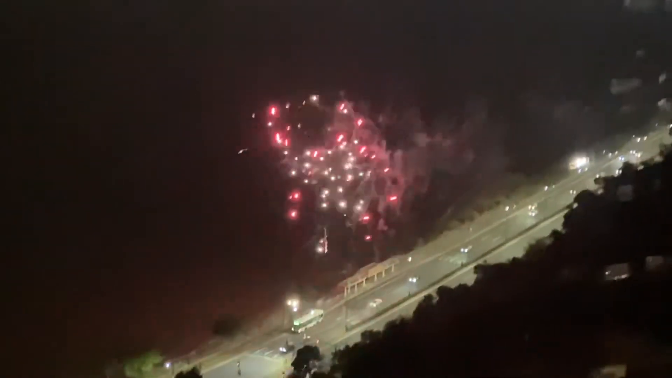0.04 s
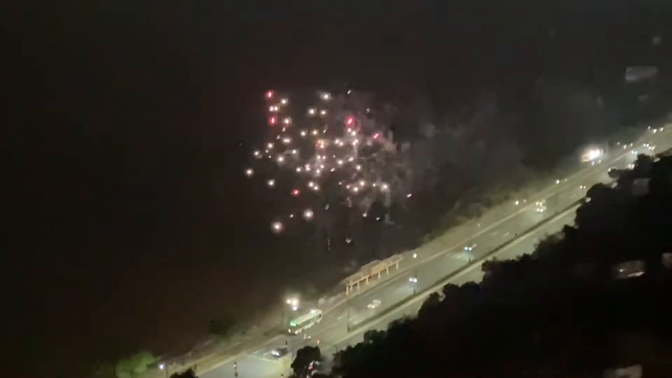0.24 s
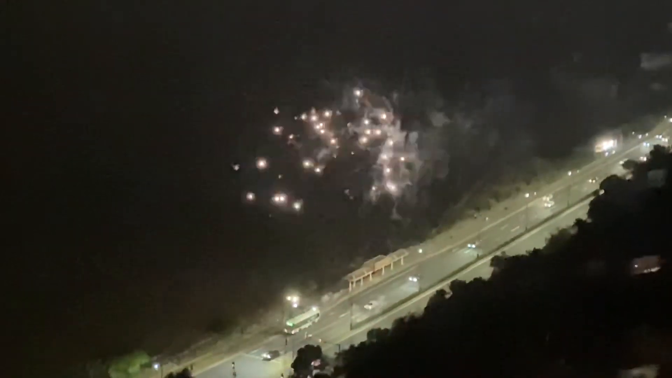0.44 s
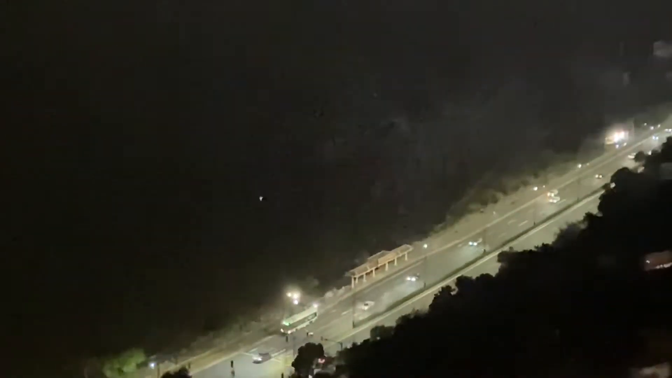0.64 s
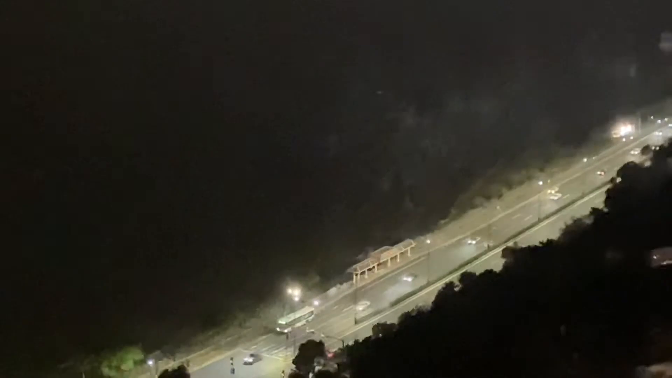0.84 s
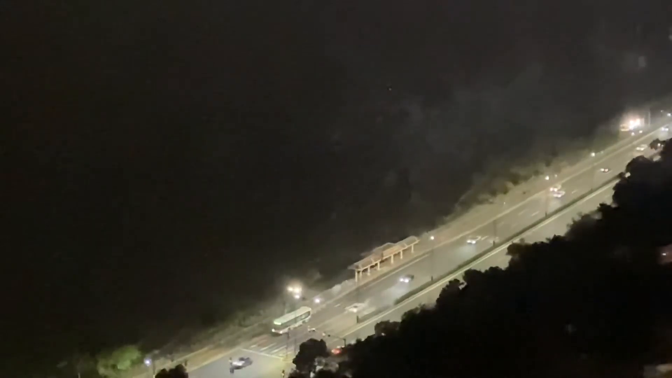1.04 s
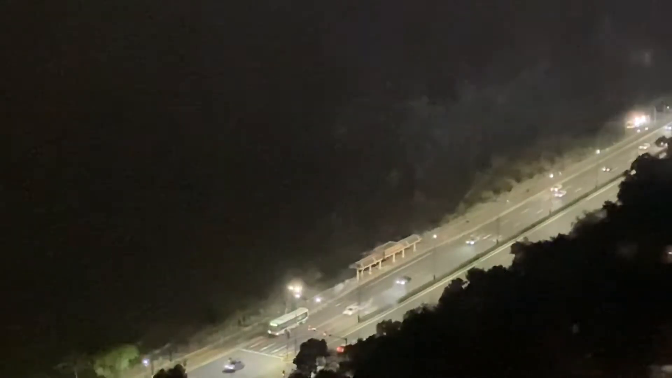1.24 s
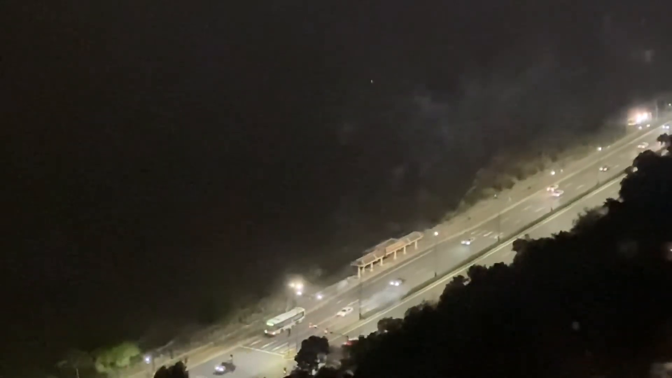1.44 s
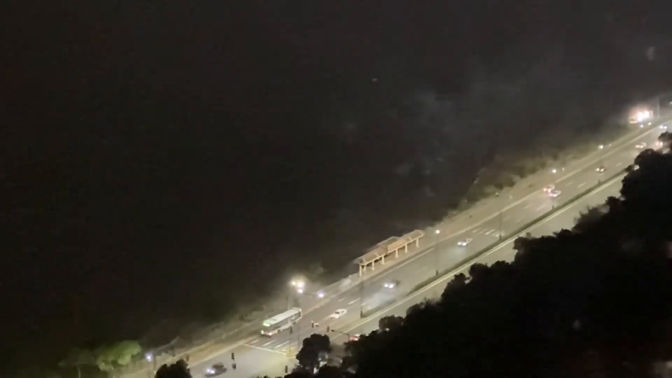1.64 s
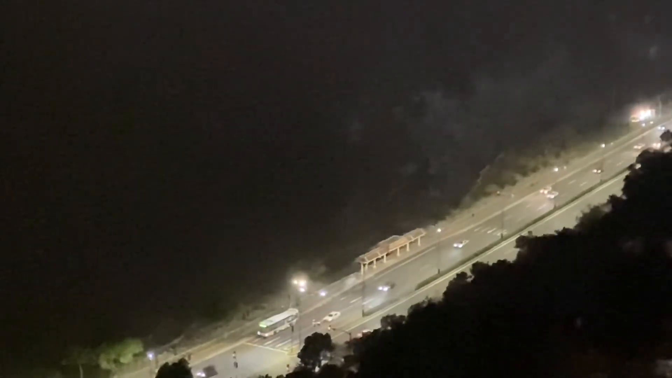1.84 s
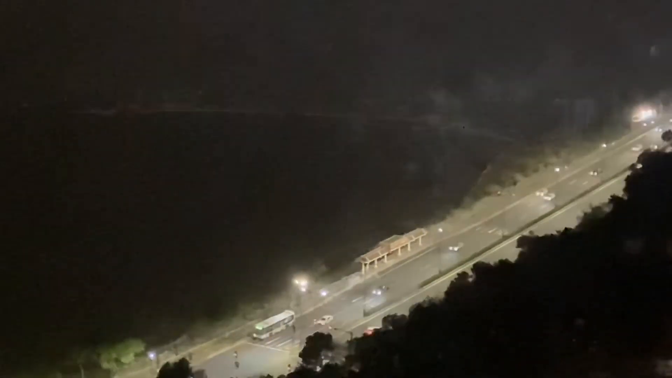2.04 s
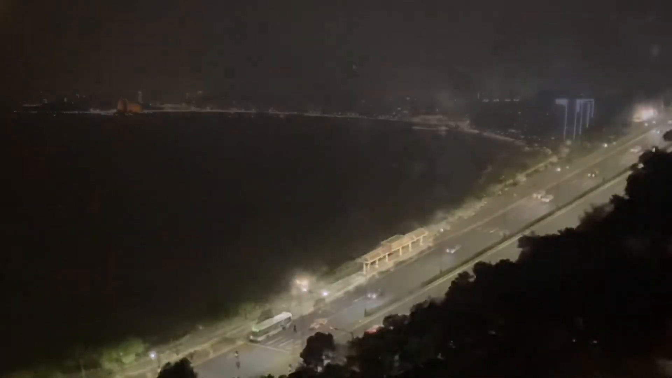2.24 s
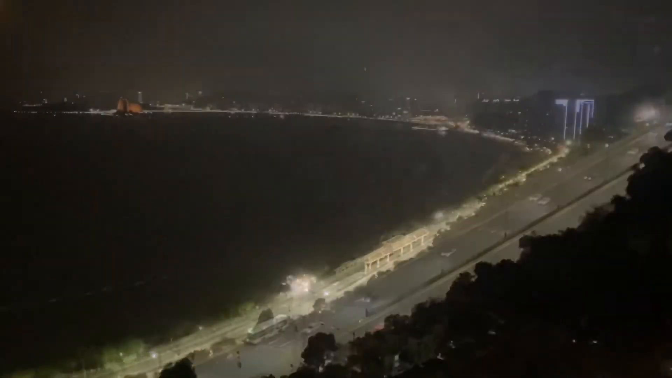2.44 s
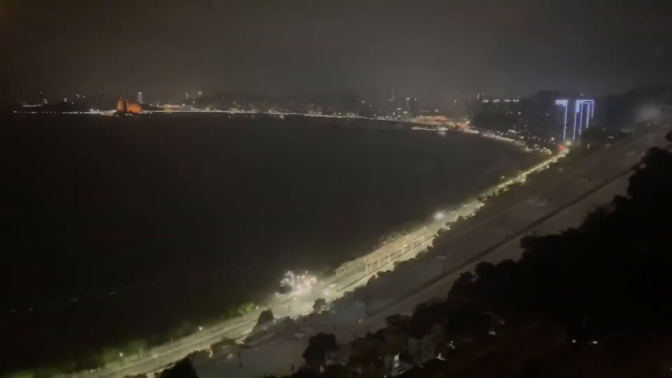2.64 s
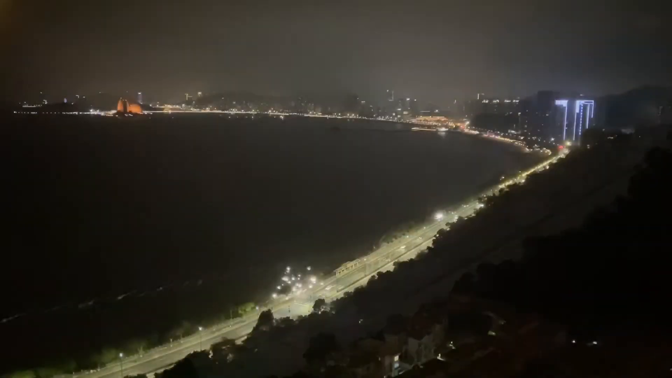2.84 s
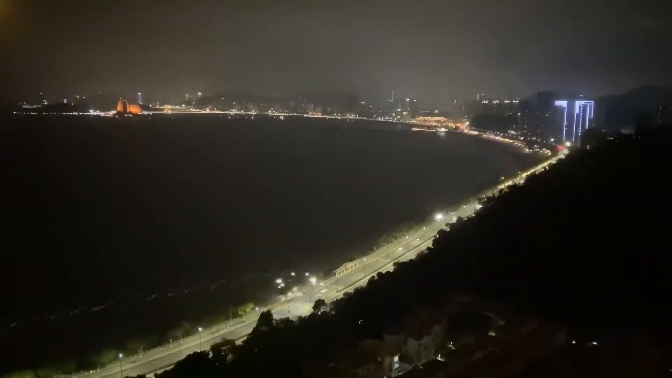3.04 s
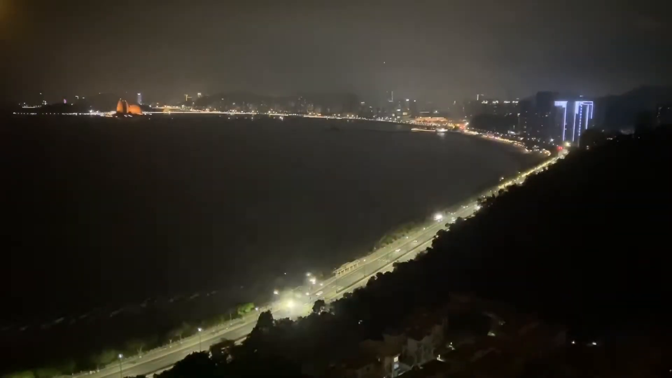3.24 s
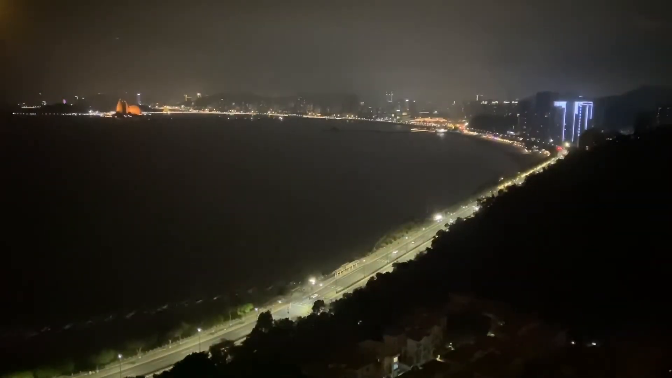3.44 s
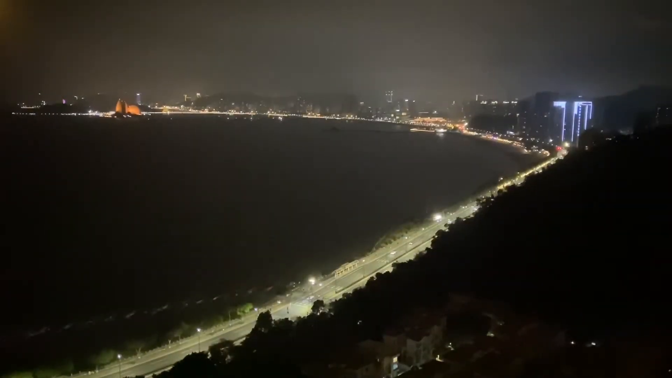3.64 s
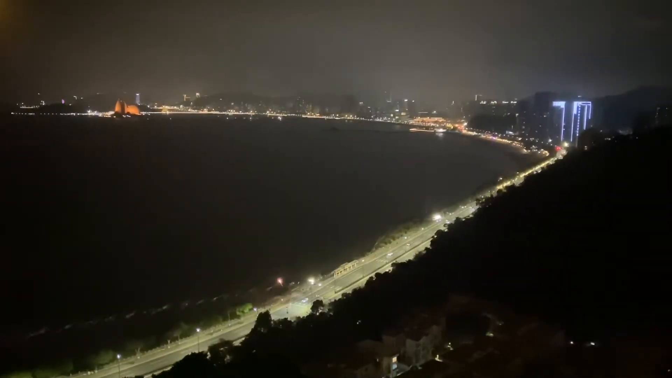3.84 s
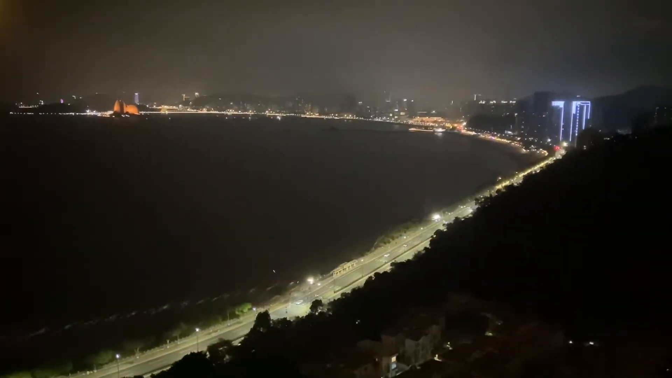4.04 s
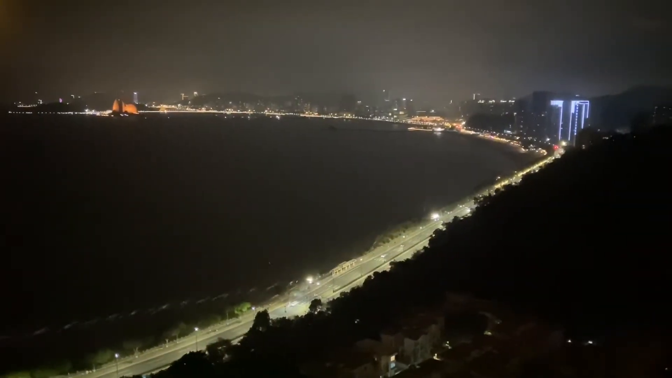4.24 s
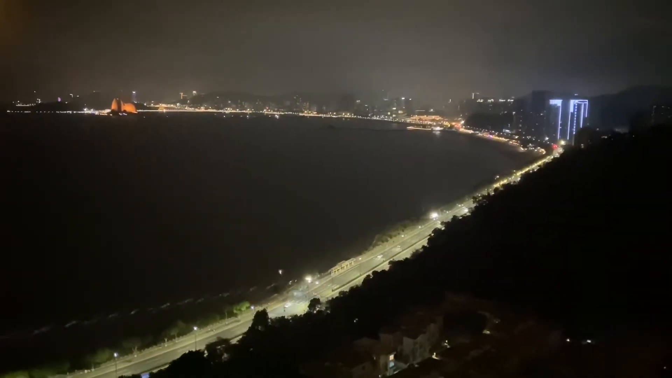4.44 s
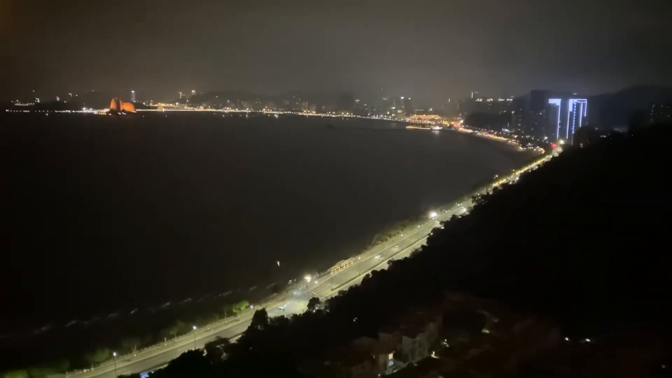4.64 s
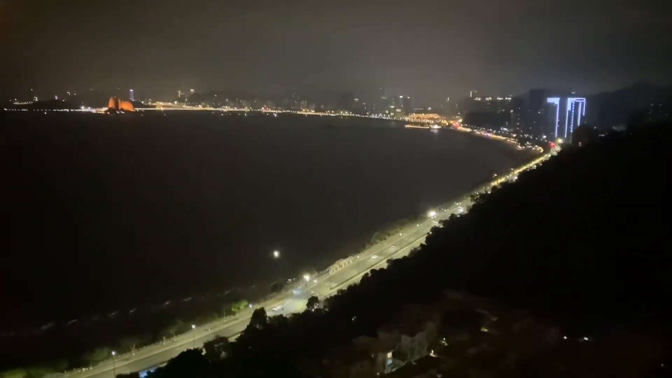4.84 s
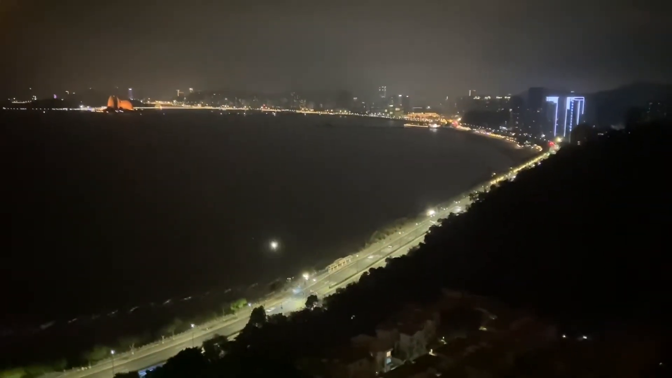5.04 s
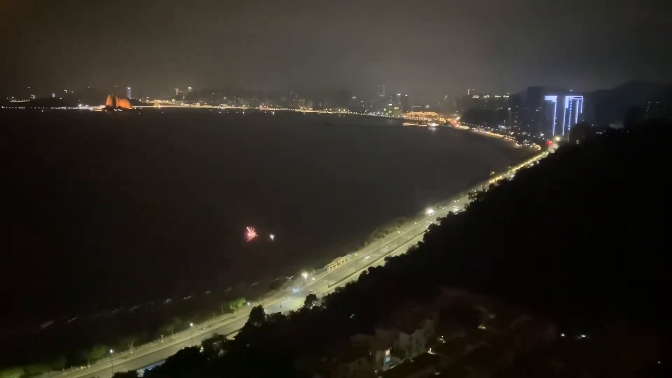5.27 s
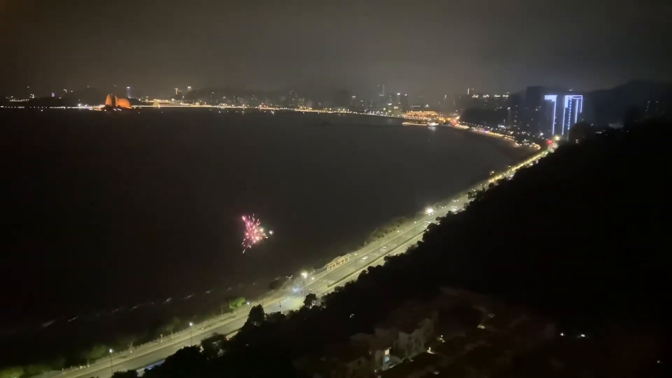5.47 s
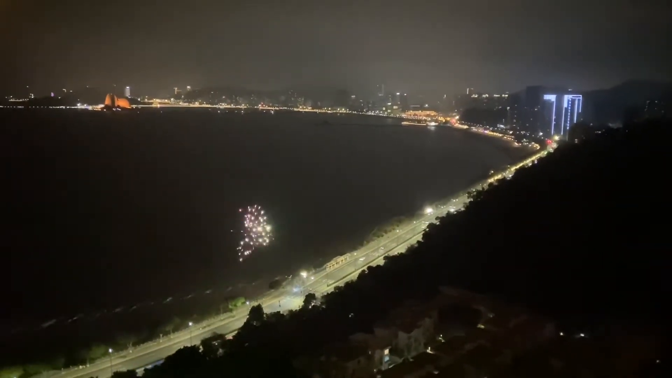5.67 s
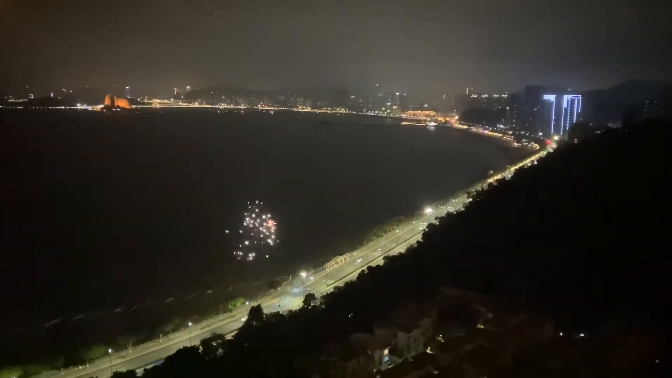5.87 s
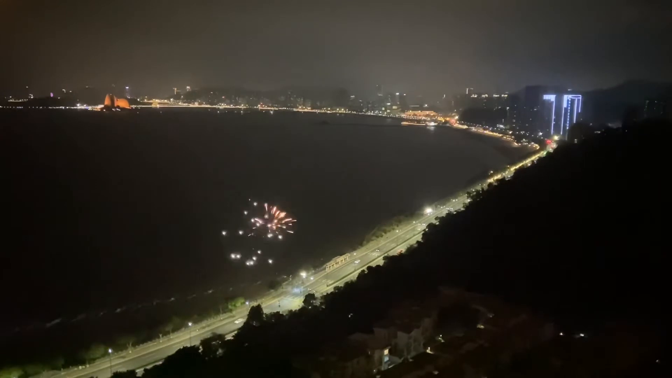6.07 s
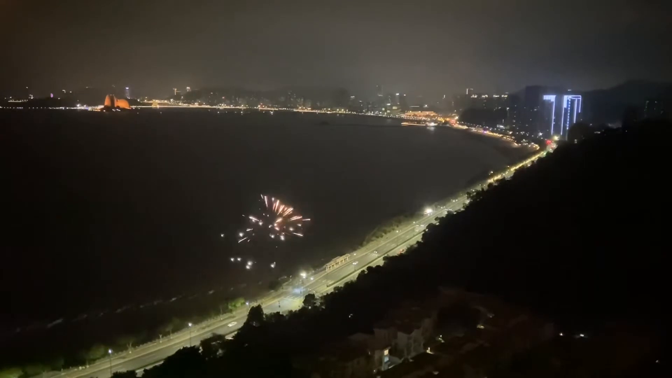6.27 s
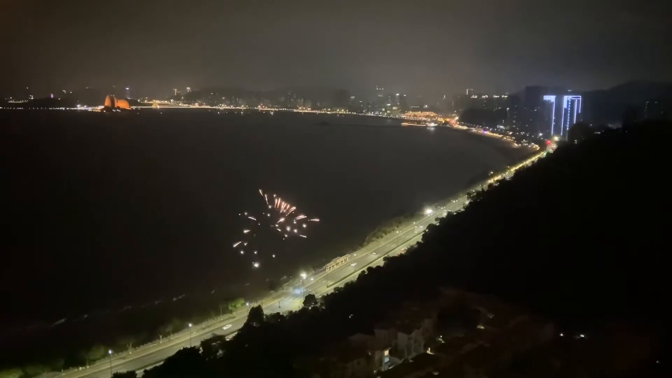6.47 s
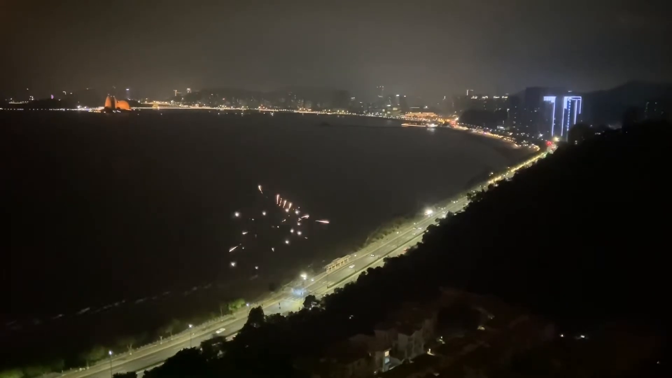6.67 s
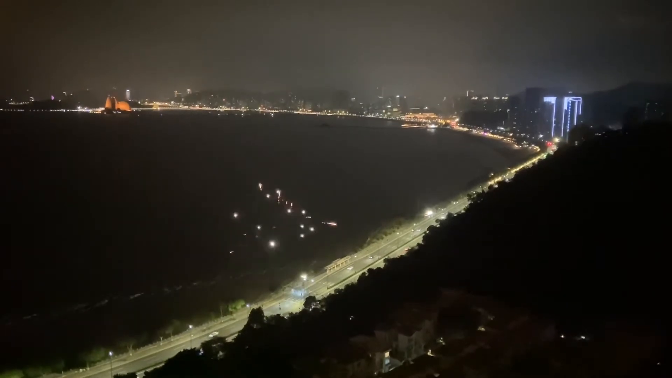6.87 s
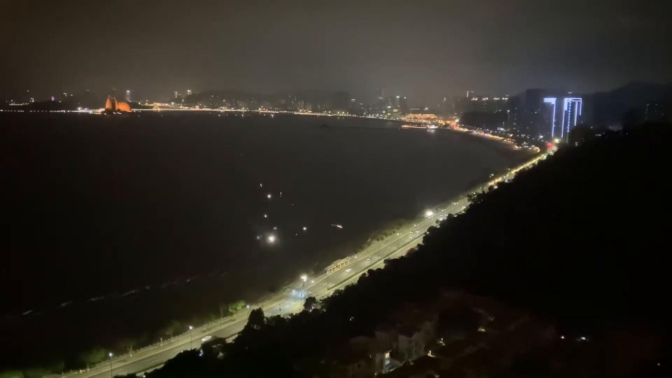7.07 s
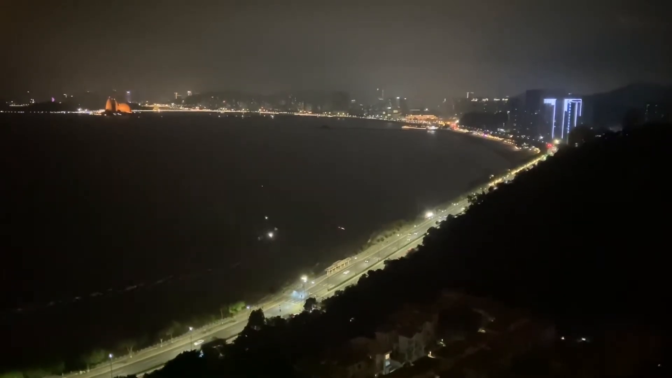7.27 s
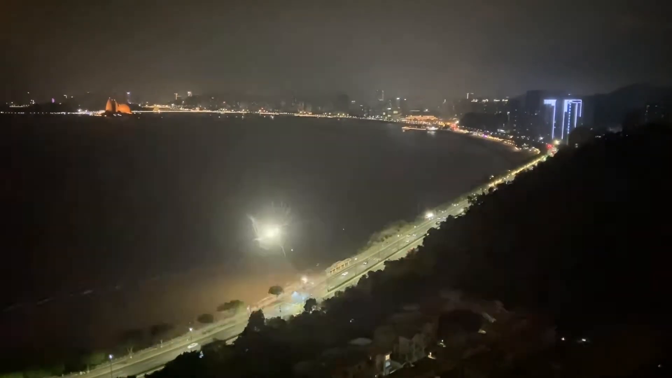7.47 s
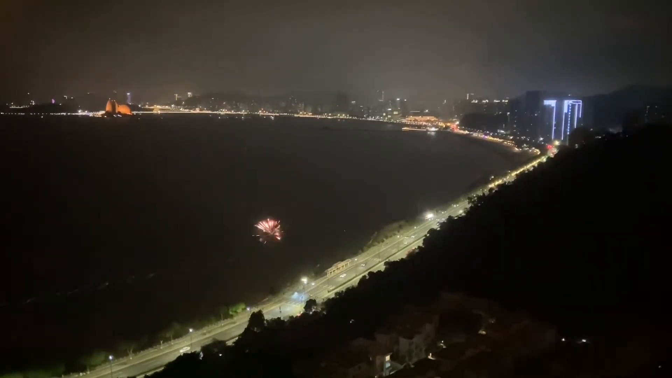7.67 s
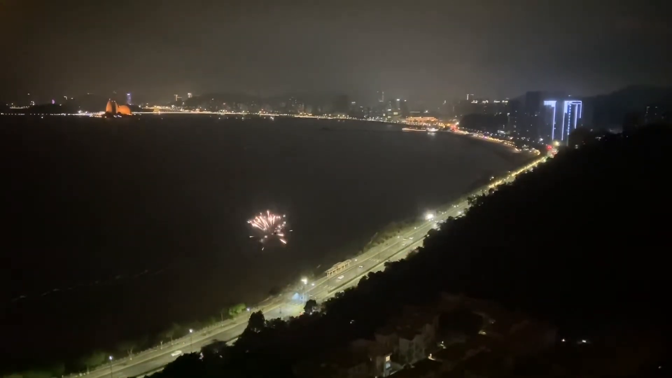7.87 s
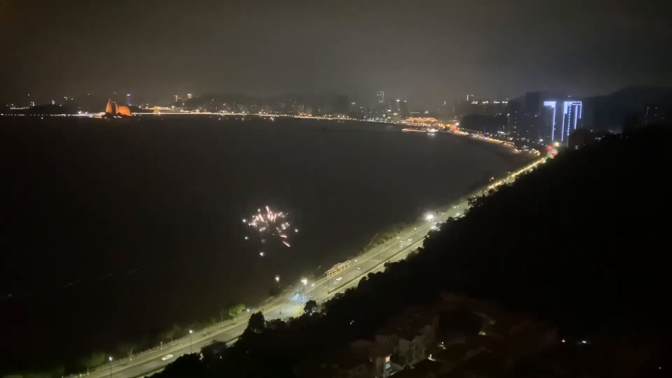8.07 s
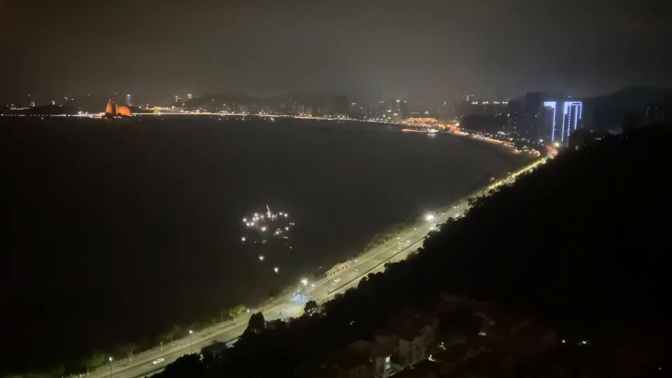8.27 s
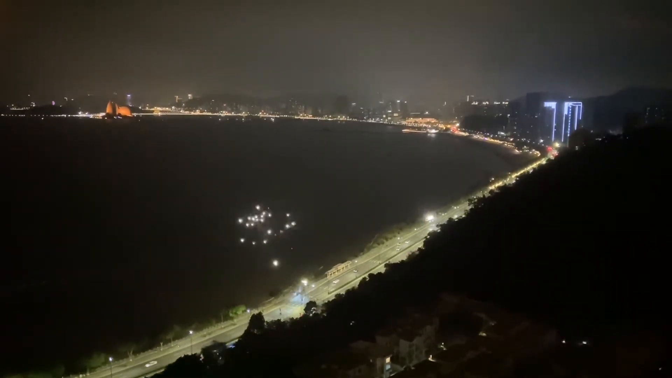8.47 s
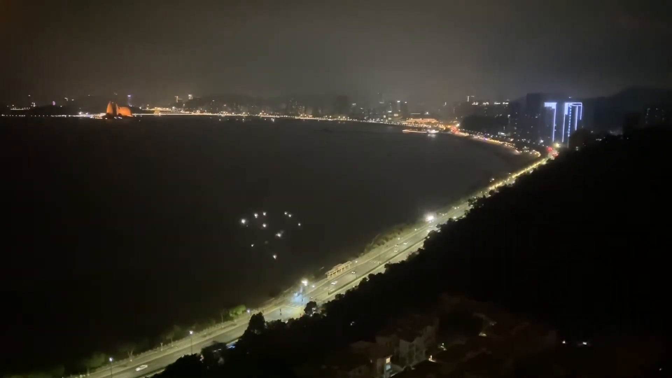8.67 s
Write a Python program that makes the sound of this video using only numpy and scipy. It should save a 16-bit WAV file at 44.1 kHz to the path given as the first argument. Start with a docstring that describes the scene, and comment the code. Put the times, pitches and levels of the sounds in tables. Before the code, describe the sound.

Night fireworks over a bay, heard on a phone from a high balcony. A fading roll and faint hum, then three rapid hard bangs and a dense crackle of burning stars. The sound opens wider; one weaker and one strong bang echo. Wind thumps the microphone around two distant pops, then two loud bangs, brief wind again and a last bang.

```python
"""Fireworks over a bay at night, heard by a phone on a high balcony.
City hum and the roll of an earlier shell come first; then three bangs and a crackle of stars, in a narrow beam.
The camera zooms out and the beam opens wide. Two more bangs, wind buffets with two far pops, then three bangs
and wind again. Bangs are shaped pulses that bounce off water, ring the balcony, slap back from walls and roll
away as decaying scatter; hum and crackle are filtered noise, buffets are thumps with noise."""
import sys
import numpy as np
from scipy import signal
from scipy.fft import rfft, irfft, next_fast_len
from scipy.io import wavfile
from scipy.ndimage import uniform_filter1d

SR = 44100
rng = np.random.default_rng(int(sys.argv[2]) if len(sys.argv) > 2 else 0)


def master(y):
    """Save y as 16-bit WAV."""
    cut = np.clip(np.atleast_2d(y).T, -1, 1)
    pcm = np.round(cut * 32767)  # scale
    wavfile.write(sys.argv[1], SR, pcm.astype(np.int16))


N = 384111

# All levels are relative gains.
# Echo fields of the roll: first_s, swell_s, t60_s, bass_db, treble_db
ECHO_FIELDS = [(.002, 0.0032, 0.26, -6.5, 4), (.03, 0.032, 0.96, -12, -5), (0.2, 0.091, 3.3, -18, -8),
               (.6, 0.33, 2.9, -22, -35.5)]
# Shell gone off before the start: level_db, tilt_db_per_octave, slap_db
EARLIER_SHELL = (-11, 1.4, -16)
# Blast spectrum: freq_hz, level_db
BLAST_SPECTRUM = [(20, -23.5), (45, -18.5), (100, -1.5), (150, -0.5), (210, -1), (320, 0.5), (430, 1.5),
                  (600, -9), (1100, -14), (1600, -24.5), (2200, -29.5), (3300, -39.5), (5000, -54.5),
                  (8000, -64), (9200, -75), (11000, -72), (13000, -80.5), (15500, -82.5)]
# Air modes of the balcony recess: freq_hz, t60_s, narrow_beam_db, wide_beam_db
BALCONY_MODES = [(103.1, 0.41, 19, 10.5), (143.3, 0.086, 12.5, 5.5), (213, 0.15, 15.5, 7.5),
                 (298.8, 0.15, 11.5, 3), (405.4, 0.2, 1.5, -0.5), (711, 0.057, -14, 0),
                 (880, 0.024, 0.5, -9), (1098.4, 0.15, 2.5, 5.5), (1308, 0.12, -8.5, 2.5),
                 (2126, 0.092, 12, -6.5), (3040, 0.36, -3.5, 5), (3260, 0.14, 14, 0)]
# Far walls: delay_s, narrow_beam_db, wide_beam_db, tilt_db_per_octave, bass_db, glint_db,
# rise_ms, smear_ms, flat_face_db
FAR_WALLS = [(.222, -31, -14.5, 5, -13.5, 6.5, 4.8, 54, -14),
             (0.257, -24.5, -13.5, 7, 3.5, -2.5, 2.3, 9.8, -13), (0.282, -17, -12, 5.5, -11, 2, 4, 14, -4),
             (.332, -3, -1.05, 4.5, -11.5, -1.5, 3.7, 16.5, -10.5)]
# Bright ring carried by slaps: freq_hz, width_hz, level_db
SLAP_GLINT = [(2364, 160, 8), (4470, 470, 0)]
# Ring of a flat wall face: freq_hz, t60_ms, level_db
FACE_RING = [(2236, 19.3, 4.5), (3240, 9, -15.5), (4280, 20, -13)]
# City spectrum, traffic and sea: freq_hz, level_db
CITY_SPECTRUM = [(20, -40.5), (40, 4), (64, 6), (170, -12), (213, -9.5), (360, -12), (550, -11), (930, -4),
                 (1400, -8), (1740, -21.5), (2100, -18), (3260, -32), (4500, -47), (5200, -60.5),
                 (6500, -50.5), (8000, -82), (15500, -78.5)]
# City level: time_s, level_db
CITY_LEVEL = [(0, -57), (1.5, -50), (2.1, -52.5), (2.5, -47), (4, -43.5), (5.4, -43.5), (6.1, -42.5),
              (7.5, -41.5), (8.71, -45.5)]
# Shells: start_s, level_db, tilt_db_per_octave, bass_db, crack_hz, crack_db, roll_db,
# bounce_ms, bounce_db, slaps_early_ms, slap_db, third_wall_extra_db,
# second_crack_hz, second_crack_db, bounce_smear_ms, bounce_bass_db
SHELLS = [(.186, -7.5, 1.5, -9, 1070, 9, 0.5, 57, -15, -4.5, -12, 4, 2060, 4.5, 2.4, -11),
          (.398, -7, 2, -10.5, 1044, 8.5, -2, 70, -16, -6, -18.5, 1, 2100, 3.5, 2.6, -10),
          (.580, -6.5, 3, -8, 1080, 3, -3, 64, -14.5, -0.5, -18, -10.5, 2070, 2, 4.6, -16),
          (2.711, -22.5, 3.5, -3.5, 3230, 15, -1, 26, -21, 2, -6.5, -0.5, 1210, 7.5, 1.8, -5.5),
          (3.045, -2.5, 3, -2.5, 1243, 16.5, -4, 41, -15.5, 9.5, -7.5, 7.5, 2130, 5.5, 3.9, -11),
          (6.136, -4.5, 3.5, 0, 752, 17, 0, 62, -2.5, 3.5, -1.5, 2, 2210, -2, 0.26, -9),
          (6.750, -1.5, 3.5, -3.5, 1930, 4, -0.5, 69.5, -9.5, 5, -4.5, 1, 873, 9, 2.7, -12.5),
          (8.375, -2.5, 3.5, -5, 2850, 8, -1, 63, -10, 7, -3, 0, 743, 10.5, 4.2, -9.5)]
# Paths to the phone, direct and off balcony walls: delay_ms, narrow_beam_db, wide_beam_db
BALCONY_PATHS = [(0, -26.5, 3.5), (1.156, -2.5, -4), (3.173, -3, -3.5), (4.15, -3.5, -7), (8.61, -4, -15.5),
                 (10.37, -23.5, -8), (15.21, -6.5, -11.5), (19.12, -5.5, -18), (25.26, -5, -31)]
# Burning-star spectrum: freq_hz, level_db
STAR_SPECTRUM = [(200, -38.5), (400, -28), (800, 4.5), (1100, 5.5), (1500, -5), (2140, -1.5), (3000, -10.5),
                 (4000, -18), (5000, -29.5), (7000, -39.5), (8200, -68), (9500, -78)]
# Star crackle level: time_s, level_db
STAR_LEVEL = [(.5, -60.5), (.95, -45), (1.2, -41), (1.43, -40.5), (1.5, -47), (1.8, -50), (1.88, -55.5),
              (2.15, -70)]
# Wind spectrum at the ports: freq_hz, level_db
WIND_SPECTRUM = [(15, -39), (25, -17.5), (54, 4.5), (97, 0.5), (160, -3), (295, -15.5), (361, -25.5),
                 (500, -28.5), (650, -62.5), (1100, -120)]
# Breeze level: time_s, level_db
BREEZE_LEVEL = [(3.8, -75.5), (3.98, -49.5), (4.6, -39), (4.7, -55.5), (5.1, -42), (5.5, -58.5), (5.9, -72),
                (7.45, -75), (7.55, -45.5), (8.2, -56), (8.4, -42.5), (8.5, -68.5)]
# Wind buffets: peak_s, level_db, fall_ms, thump_hz
WIND_BUFFETS = [(4.305, -27.5, 13, 64.2), (4.46, -35.5, 18, 115), (4.546, -35.5, 35, 128),
                (4.814, -23, 22, 105.3), (4.865, -31, 19, 121.5), (4.885, -33.5, 14, 69.4),
                (4.918, -26.5, 18, 136), (4.992, -26.5, 12, 141.5), (5.017, -22.5, 30, 91.7),
                (5.085, -34, 19, 83.5), (5.127, -25.5, 6.9, 92.3), (5.185, -34, 21, 70.7),
                (5.256, -24.5, 18, 72.6), (5.315, -28.5, 9.4, 124), (5.386, -36.5, 11, 68.3),
                (5.492, -42, 29, 100), (7.675, -29, 8.1, 74.5), (7.755, -37.5, 24, 78.8),
                (8.02, -35.5, 33, 123.5), (8.169, -35.5, 15, 65.5)]
# Far pops: start_s, level_db, farthest_wall_echo_db
FAR_POPS = [(4.562, -24.5, -39), (5.067, -29, -42)]
# Pop and its echo: tilt_db_per_octave, bass_db, glint_db, rise_ms, smear_ms, flat_face_db
POP_SHAPE = (4.5, 4.5, 4, -0.2, 16.5, -9)
POP_ECHO_SHAPE = (3.5, -15, 9, 12, 28, -42)
# Beam colour: freq_hz, narrow_beam_db, wide_beam_db
BEAM_COLOUR = [(30, 5, -7), (82.5, 2, -0.1), (193, 2, 4.5), (315, 2, 1.5), (635, -2, -1),
               (980, -3.5, -1.86), (1540, -2.5, -0.5), (2210, -1.5, -2.5), (3500, 1.5, -5), (4620, 6, 2),
               (4860, 6.5, 0), (7600, 6, -2)]
# Microphone pair per beam: freq_hz, left_lead_rad, left_minus_right_db, likeness (0 to 1)
NARROW_PAIR = [(100, -.2, .7, .97), (300, -.7, 0, .93), (500, -1.1, 0, .8), (650, -1.2, -3, .4),
               (1000, -1.7, -1, .5), (1400, -1, -2.5, .25), (2000, .2, 2, .85), (2400, 0, .5, .98),
               (7300, 0, 0, 1), (14000, -10, .5, .9)]
WIDE_PAIR = [(100, .1, .5, .95), (230, .4, .5, .85), (430, 2.1, 7.5, .5), (600, 3, 2.5, .25),
             (850, 4, 6, .45), (1300, 3, 3, .65), (1700, 2, 1, .5), (2100, .1, -1, .75), (3000, .4, 3, .5),
             (4500, .2, 5, .7), (5400, 2.5, 5, .2), (6800, 6.4, .5, .75), (14000, -4, .5, .85)]

NARROW_COL, WIDE_COL = 1, 2  # beam columns where the key comes first
ZOOM_START_S, ZOOM_END_S = 2.19, 2.25
EARLIER_START_S, ROLL_LEAD_S = -0.297, 1  # the roll buffer starts before time 0
TREBLE_EXTRA_T60_S = 1.8  # on top of each field's own decay
BOUNCE_TILT_DB_PER_OCTAVE = -1
FACE_RISE_MS, POP_ECHO_EARLY_S = 1.8, 0.012
BUFFET_RISE_SHARE = 0.48  # of the fall time
FLUTTER_DB = -4  # against the thump, before port gains
SELF_NOISE_DB, EDGE_HZ = -90.5, 15500  # noise level is before its band filter

LONG = next_fast_len(N + SR)
HZ = np.fft.rfftfreq(LONG, 1 / SR)
T = np.arange(N) / SR


def gain_of(db):
    """Factor from dB."""
    return 10 ** (np.asarray(db) / 20)


def read(points, hz, axis=1):
    """Table column interpolated over log frequency."""
    columns = np.transpose(points)
    return np.interp(np.log(hz + 1), np.log(columns[0] + 1), columns[axis])


def curve(rows, t):
    """Level over time in dB, -200 outside the table."""
    times_s, levels_db = np.transpose(rows)
    return np.interp(t, times_s, levels_db, -200, -200)


def colour(x, gain):
    """Filter along the last axis by a gain given at HZ."""
    return irfft(rfft(x, LONG) * gain, LONG)[..., :x.shape[-1]]


def hiss(spectrum):
    """Two unrelated noises of one spectrum, rms 1."""
    x = colour(rng.standard_normal((2, N)), gain_of(read(spectrum, HZ)))
    return x / x.std()


def wander(seconds):
    """Noise smoothed twice over a window, rms 1."""
    width = int(seconds * SR)
    x = uniform_filter1d(rng.standard_normal(N), width)
    x = uniform_filter1d(x, width)
    return x / x.std()


def add(mix, s, sound):
    """Mix a sound in place at s seconds."""
    part = mix[..., round(s * SR):][..., :sound.shape[-1]]
    part += sound[..., :part.shape[-1]]


def shock(tilt_db, bass_db, bass_hz, peaks):
    """Minimum-phase blast pulse, peak 1: tilt over 300-6000 Hz, bass shelf, resonant peaks."""
    hz = abs(np.fft.fftfreq(8192, 1 / SR))
    tilt = tilt_db * np.log2(np.clip(hz, 300, 6000) / 300)
    shelf = bass_db / (1 + (hz / bass_hz) ** 4)
    ring = sum(db / (1 + (2 * (hz - f) / width) ** 2) for f, width, db in peaks)
    log_gain = np.log(gain_of(read(BLAST_SPECTRUM, hz) + tilt + shelf + ring))
    minimum_phase = np.exp(np.conj(signal.hilbert(log_gain)))
    pulse = np.fft.ifft(minimum_phase).real[:4096]
    return pulse / abs(pulse).max()


def roll(split_hz=600):
    """Echoes off hills, water and streets: uneven noise in fields that swell and decay."""
    t = np.arange(3 * SR) / SR
    uneven_db = wander(0.017)[:len(t)]
    scatter = rng.standard_normal((2, len(t))) / np.sqrt(0.012 * SR) * gain_of(uneven_db)
    # air soaks up the highest treble
    dull = signal.sosfilt(signal.butter(2, 6000, fs=SR, output="sos"), scatter)
    scatter = dull + (scatter - dull) * gain_of(-60 * t / TREBLE_EXTRA_T60_S)
    power = np.zeros((2, len(t)))  # bass, treble
    for first_s, swell_s, t60_s, bass_db, treble_db in ECHO_FIELDS:
        since = np.maximum(t - first_s, 0)
        rise = np.minimum(since / swell_s, 1)
        decay_db = -60 * np.maximum(since - swell_s, 0) / t60_s
        power += (rise * gain_of(np.array([[bass_db], [treble_db]]) + decay_db)) ** 2
    bass = 1 / (1 + (HZ / split_hz) ** 2)
    return colour(scatter * np.sqrt(power[0]), bass) + colour(scatter * np.sqrt(power[1]), 1 - bass)


def recess(axis):
    """Decaying sines of the balcony air in one beam; each dB is the gain at its mode."""
    t = np.arange(SR // 2) / SR
    out = np.zeros(len(t))
    for hz, t60_s, *beam_db in BALCONY_MODES:
        unit_gain = 2 * np.log(1000) / (t60_s * SR)
        out += gain_of(beam_db[axis - 1] - 60 * t / t60_s) * np.sin(2 * np.pi * hz * t) * unit_gain
    return out


def slap(db, tilt_db, bass_db, glint_db, rise_ms, smear_ms, face_db):
    """Wall echo: ring of the flat face plus a pulse smeared by sparse random facets."""
    ms = np.arange(4000) / SR * 1000
    facets = rng.standard_normal((2, len(ms))) ** 3 * (rng.random(len(ms)) < 0.04)
    facets = facets * (1 - np.exp(-ms / max(rise_ms, 0.1))) * np.exp(-ms / max(smear_ms, 1))
    peaks = [(f, width, glint_db + d) for f, width, d in SLAP_GLINT]
    pulse = shock(tilt_db, bass_db, 290, peaks)
    echo = signal.fftconvolve(facets, pulse[None], axes=1)
    echo = echo / np.linalg.norm(echo) * 14
    shift = rng.uniform(0.95, 1.05)
    snap = sum(gain_of(d - 60 * ms / t60_ms) * np.sin(2 * np.pi * hz * shift * ms / 1000)
               for hz, t60_ms, d in FACE_RING)
    snap = snap * (1 - np.exp(-ms / FACE_RISE_MS))
    add(echo, 0, gain_of(face_db) * snap * gain_of([[0.0], [-6.0]]))
    return gain_of(db) * echo


def earlier_shell(slaps, rolling):
    """Shell from before time 0: its roll and its last wall slap remain."""
    db, tilt_db, slap_db = EARLIER_SHELL
    add(rolling, ROLL_LEAD_S + EARLIER_START_S, gain_of(db) * shock(tilt_db, -1, 140, []))
    last_wall = FAR_WALLS[-1]
    add(slaps, EARLIER_START_S + last_wall[0], slap(db + slap_db, *last_wall[3:]))


def city():
    """Far traffic and sea: filtered noise of slightly varying level."""
    return hiss(CITY_SPECTRUM) * gain_of(curve(CITY_LEVEL, T) + 0.31 * wander(0.038))


def balcony(axis):
    """Impulse response: wall bounces, the later the duller, plus the recess ring."""
    out, t = recess(axis), np.arange(256)
    for path in BALCONY_PATHS:
        soft = np.exp(-t / (1.3 + 0.1 * path[0]))
        add(out, path[0] / 1000, gain_of(path[axis]) * soft / soft.sum())
    return out


def ripples(smear_ms):
    """Facets of rough water: sparse random taps that spread a bounce in time."""
    ms = np.arange(1000) / SR * 1000
    facets = np.r_[1, rng.uniform(-1, 1, len(ms) - 1) ** 41] * np.exp(-ms / max(smear_ms, 0.001))
    return facets / np.linalg.norm(facets)


def bangs(near, slaps, rolling):
    """Shell blasts: direct and water-bounced pulses ring the balcony, feed the roll, slap off walls."""
    rooms = {axis: balcony(axis) for axis in (NARROW_COL, WIDE_COL)}
    for (s, db, tilt_db, bass_db, crack_hz, crack_db, roll_db, bounce_ms, bounce_db, early_ms, slap_db,
         third_wall_db, second_hz, second_db, smear_ms, bounce_bass_db) in SHELLS:
        beam = NARROW_COL if s < ZOOM_START_S else WIDE_COL
        cracks = [(crack_hz, 0.13 * crack_hz, crack_db), (second_hz, 0.093 * second_hz, second_db)]
        direct = (s, db, tilt_db, bass_db, 0)
        bounce = (s + bounce_ms / 1000, db + bounce_db, tilt_db + BOUNCE_TILT_DB_PER_OCTAVE,
                  bounce_bass_db, smear_ms)
        for at_s, level_db, slope_db, low_db, spread_ms in (direct, bounce):
            pulse = shock(slope_db, low_db, 190, cracks)
            pulse = signal.fftconvolve(pulse, ripples(spread_ms))
            add(near, at_s, gain_of(level_db) * signal.fftconvolve(pulse, rooms[beam]))
            roll_pulse = gain_of(level_db + roll_db) * shock(slope_db, low_db, 56, [])
            add(rolling, ROLL_LEAD_S + at_s, roll_pulse)
        for index, wall in enumerate(FAR_WALLS):
            level_db = db + slap_db + wall[beam] + third_wall_db * (index == 2)
            add(slaps, s + wall[0] - early_ms / 1000, slap(level_db, *wall[3:]))


def stars():
    """Burning stars: dense far crackle, filtered noise of fluctuating level."""
    return hiss(STAR_SPECTRUM) * gain_of(curve(STAR_LEVEL, T) + 1.8 * wander(0.043))


def wind():
    """Breeze noise partly unrelated at the ports; buffets add soft low thumps and flutter."""
    a, b = hiss(WIND_SPECTRUM)
    level, thumps = gain_of(curve(BREEZE_LEVEL, T)), np.zeros(N)
    for peak_s, db, fall_ms, thump_hz in WIND_BUFFETS:
        since = (T - peak_s) * 1000 / fall_ms
        since = np.where(since < 0, since / BUFFET_RISE_SHARE, since)
        push = gain_of(db) / np.cosh(np.clip(since, -30, 30)) ** 2
        level = level + gain_of(FLUTTER_DB) * push
        thumps = thumps + push * np.cos(2 * np.pi * thump_hz * (T - peak_s))
    noise = np.array([a + 0.17 * b, a - 0.4 * b])
    return noise * level + thumps * gain_of([[0.3], [-0.3]])


def pops(slaps):
    """Far pops: smeared pulses, each with a faint smear off the farthest wall."""
    for s, db, echo_db in FAR_POPS:
        add(slaps, s, slap(db, *POP_SHAPE))
        add(slaps, s + FAR_WALLS[-1][0] - POP_ECHO_EARLY_S, slap(echo_db, *POP_ECHO_SHAPE))


def fireworks():
    """All shells: row 0 reaches both ports alike, row 1 is scatter that differs between them."""
    near, slaps, rolling = np.zeros(N), np.zeros((2, N)), np.zeros(N + ROLL_LEAD_S * SR)
    earlier_shell(slaps, rolling)
    bangs(near, slaps, rolling)
    pops(slaps)
    lead = ROLL_LEAD_S * SR
    rolled = signal.fftconvolve(rolling[None], roll(), axes=1)[:, lead:lead + N]
    far = slaps + rolled
    # echoes ring the recess too
    far_ring = signal.fftconvolve(far, recess(WIDE_COL)[None], axes=1)[:, :N]
    return near * gain_of([[4.5], [-6.5]]) + far + gain_of(-2.5) * far_ring


def ports(x, pair):
    """Left and right of a microphone pair: shared sound in phase, scattered sound in antiphase."""
    lean = gain_of(read(pair, HZ, axis=2) / 2) * np.exp(0.5j * read(pair, HZ))
    likeness = np.clip(read(pair, HZ, axis=3), 0, 1)
    shared, apart = np.sqrt((1 + likeness) / 2), np.sqrt((1 - likeness) / 2)
    left = colour(x[0], shared * lean) + colour(x[1], apart * lean)
    right = colour(x[0], shared / lean) - colour(x[1], apart / lean)
    return np.array([left, right])


def scene():
    """Crossfade from narrow to wide beam as the camera zooms out; wind acts on the ports directly."""
    air = fireworks() + stars() + city()
    narrow = colour(air, gain_of(read(BEAM_COLOUR, HZ, axis=NARROW_COL)))
    wide = colour(air, gain_of(read(BEAM_COLOUR, HZ, axis=WIDE_COL)))
    opened = np.interp(T, (ZOOM_START_S, ZOOM_END_S), [0, 1])
    return (1 - opened) * ports(narrow, NARROW_PAIR) + opened * ports(wide, WIDE_PAIR) + wind()


def record(dry, turns=1.25):
    """Beam filters delay 60-3000 Hz by `turns` cycles, so bangs sweep down; self-noise, soft clip, low-pass."""
    swept = colour(dry, np.exp(-2j * np.pi * turns * np.log(np.clip(HZ, 60, 3000) / 3000)))
    band = signal.butter(3, (6000, 12500), "band", fs=SR, output="sos")
    swept = swept + gain_of(SELF_NOISE_DB) * signal.sosfilt(band, rng.standard_normal(dry.shape))
    clipped = swept / (1 + abs(swept / 0.97) ** 6) ** (1 / 6)
    low_pass = signal.firwin(511, EDGE_HZ, window=("kaiser", 9), fs=SR)
    return signal.oaconvolve(clipped, low_pass[None], "same")


dry = scene()
out = record(dry)
master(out)
```